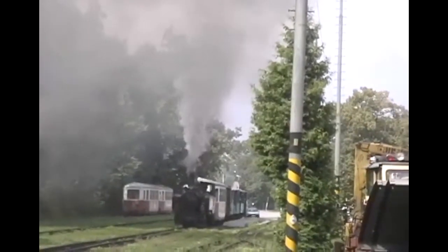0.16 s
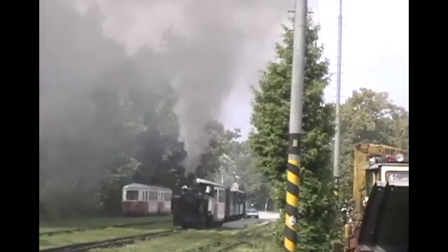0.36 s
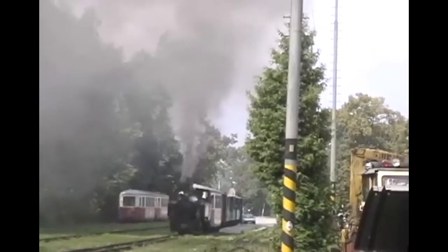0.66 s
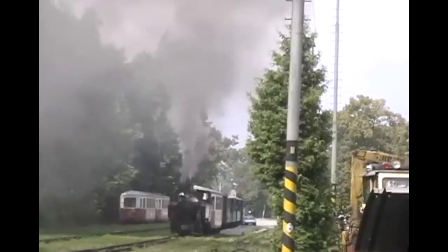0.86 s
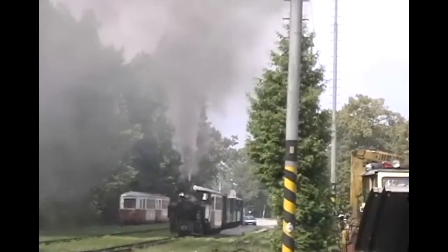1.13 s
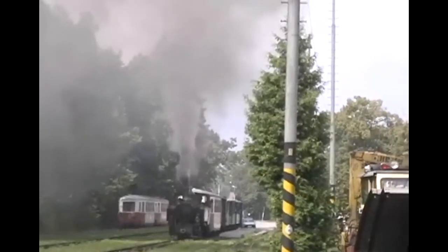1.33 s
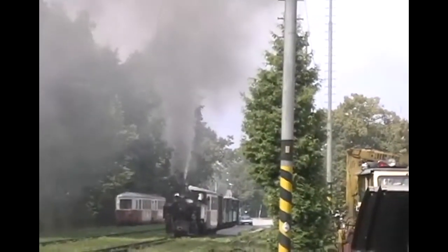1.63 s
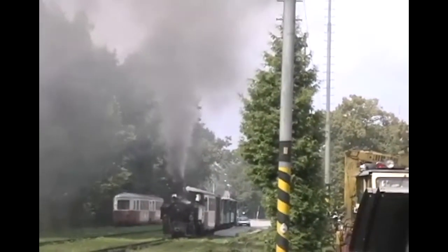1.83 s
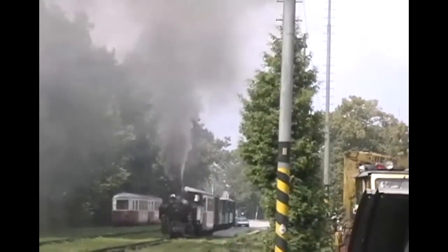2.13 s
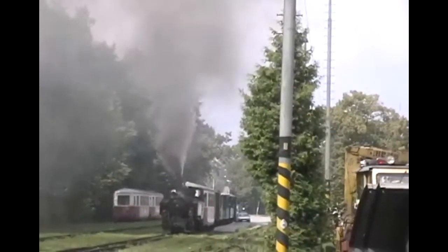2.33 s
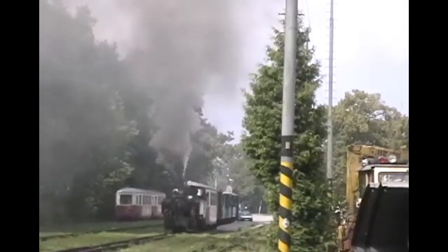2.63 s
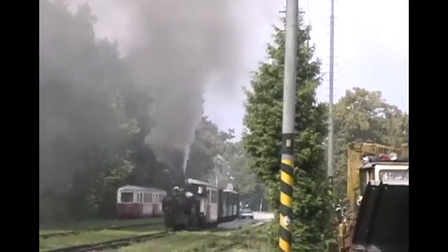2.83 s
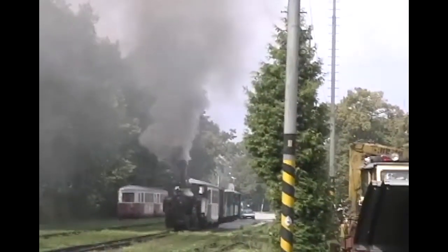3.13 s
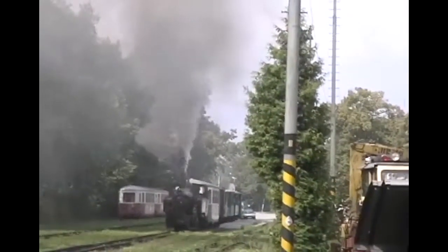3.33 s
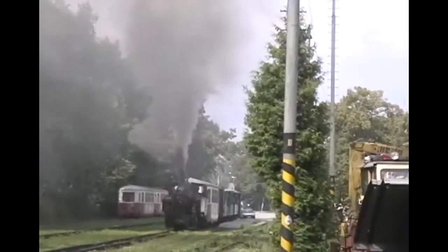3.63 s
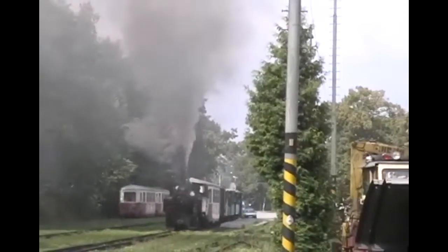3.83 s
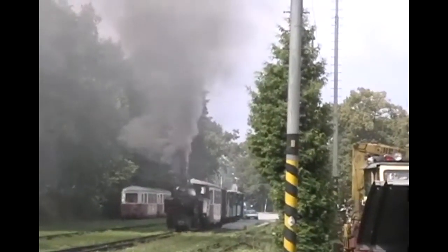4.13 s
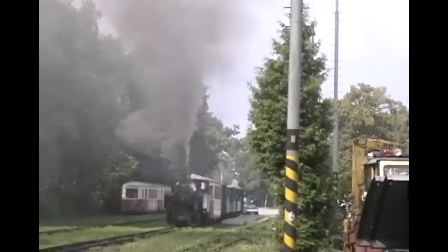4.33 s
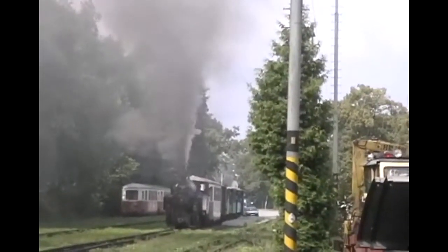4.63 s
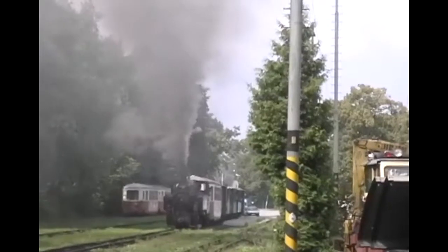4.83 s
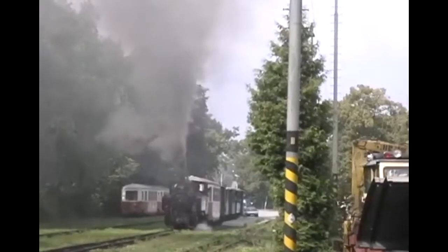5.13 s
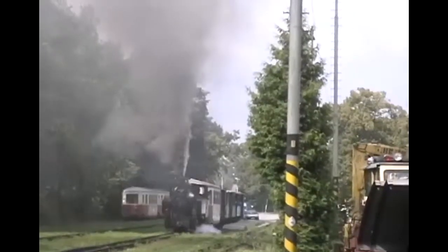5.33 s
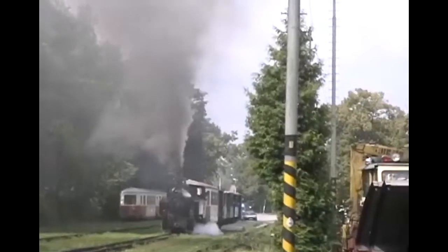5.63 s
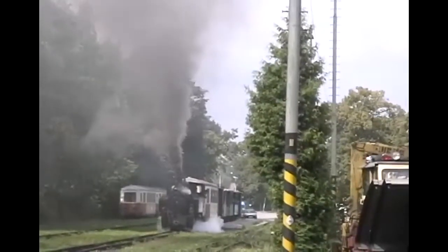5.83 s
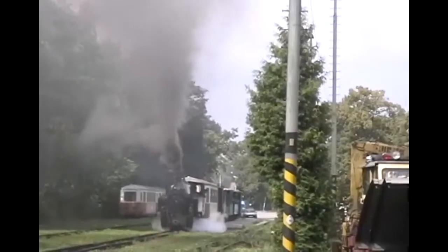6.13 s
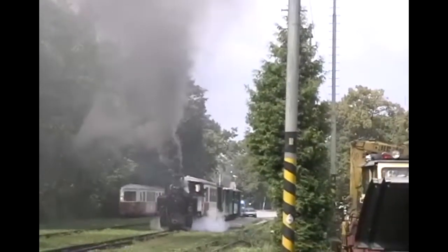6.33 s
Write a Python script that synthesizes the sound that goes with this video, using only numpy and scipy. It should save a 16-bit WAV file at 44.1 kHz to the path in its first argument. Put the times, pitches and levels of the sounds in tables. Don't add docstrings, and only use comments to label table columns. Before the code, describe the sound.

A small steam locomotive chuffs hard and slowly among trees, roaring exhaust beats alternating with whistling leaks, then drain cocks blow a wet hiss.

```python
import sys
import numpy as np
from scipy import signal
from scipy.fft import rfft, irfft, next_fast_len
from scipy.io import wavfile

SR = 44100
rng = np.random.default_rng(int(sys.argv[2]) if len(sys.argv) > 2 else 0)


def ratio_of_db(decibels):
    return 10 ** (np.asarray(decibels, float) / 20)


def transcribe(signal):
    frames = np.atleast_2d(signal).T
    limited = np.clip(frames, -1, 1)
    pcm = np.round(limited * 32767).astype(np.int16)
    wavfile.write(sys.argv[1], SR, pcm)


N = 285327
PADDED = next_fast_len(N + 3 * SR // 2)
HZ = np.maximum(np.arange(PADDED // 2 + 1) * SR / PADDED, 1)
TIME = np.arange(N) / SR

# (time [s], thump [dB], crack [dB], rasp [dB], brightness [dB])
BEATS = [
    (0.2192, -26, -18, 1, 0.5),
    (0.763, -26.5, -23, 1.5, 0),
    (1.265, -25.5, -13, 0.5, 0),
    (1.8327, -26.5, -30, 2, 3.5),
    (2.3453, -24.5, -15, 3.5, 3.5),
    (2.9244, -27.5, -30, 2.5, 1.5),
    (3.4721, -25, -19, 3, 4),
    (4.0885, -26.5, -30, 0.5, 2.5),
    (4.7450, -27.5, -18, 0, 0),
    (5.57, -36, -45, 2, 1),
]
# (time [s], top [dB], rise [s], hold [s], fall [dB per s])
BLASTS = [(-.3, -22, 0.022, 0.15, 61), (.219, -21.5, .008, 0.091, 40), (0.756, -22, 0.025, .14, 84),
          (1.263, -20, 0.0077, 0.083, 45.5), (1.83, -21.5, 0.017, 0.14, 91), (2.344, -20.5, .01, 0.082, 46),
          (2.925, -20, 0.019, .12, 87), (3.472, -19, .004, 0.027, 40), (4.084, -22, 0.023, 0.13, 62),
          (4.743, -21, 0.016, 0.1, 47.5), (5.529, -21, 0.069, 0.066, 49)]
# (frequency [Hz], level [dB per Hz])
JET_COLOUR = [(200, -30.5), (300, -22.5), (600, -12), (1000, -6), (1600, -1.5), (2250, -4), (2600, -7.5),
              (3000, -9.5), (3700, -6), (4600, -6.5), (5150, -13), (8000, -16.5), (11000, -23.5),
              (14200, -39)]
# (delay [s], share [ratio])
CHIMNEY_RETURNS = [(.0013, 0.086), (.00333, -0.12), (.00667, -0.069), (.00848, -0.028), (.00889, .09),
                   (0.0107, 0.11)]
# (delay [s], level [dB])
THUMP_ECHOES = [(.022, -12.5), (.05, -12.5)]
# (opens [s], shuts [s], opening level [dB], swell level [dB], settled level [dB])
LEAKS = [
    (-.33, .24, -37, -37, -42),
    (0.739, 1.287, -37, -38.5, -39.5),
    (1.806, 2.347, -33.5, -37, -37),
    (2.898, 3.45, -36, -32.5, -38.5),
    (4.061, 4.76, -36.5, -50, -39.5),
    (5.53, 5.975, -41, -37.5, -54),
]
# (frequency [Hz], level [dB per Hz])
LEAK_COLOUR = [(600, -72), (1000, 2.5), (1500, -1.5), (2500, -5.5), (4400, -10), (4900, -0.5), (5400, -5),
               (6100, -8.5), (7600, -8), (8600, -15.5), (9900, -17.5), (10700, -16.5), (11700, -20),
               (14000, -56)]
# (time [s], peak [dB], frequency [Hz])
SPITS = [
    (0.741, -24.5, 8700),
    (1.812, -22, 8600),
    (2.9018, -31, 7360),
    (4.0622, -31, 6700),
    (5.542, -29.5, 8150),
]
# (time [s], level [dB])
DRAIN_LEVEL = [
    (5.85, -41),
    (5.928, -41),
    (6.104, -35),
    (6.346, -36),
    (6.47, -38),
]
# (frequency [Hz], level [dB per Hz])
DRAIN_COLOUR = [(300, -5.5), (600, -8), (1300, -5), (2700, -7), (4400, -5), (5000, -3.5), (5500, -5),
                (6100, -6), (7400, -5), (8800, -11.5), (10700, -17), (14000, -28.5)]
# (time [s], pitch [ratio])
DRAIN_PITCH = [(6.0, 1.02), (6.47, .95)]
# (frequency [Hz], width [Hz], level [dB])
WHISTLES = [(5050, 260, -8.5), (5260, 170, -4), (5560, 110, -2.5), (6860, 300, -36), (7600, 500, -16.5),
            (10700, 500, -24)]
# (frequency [Hz], time [s])
WOOD_DECAY = [(300, 1.64), (1500, 0.48), (4000, 1.02), (8000, 1.08), (13000, 0.99)]
# (time [s], rumble [dB], ground shake [dB])
JOINTS = [(.63, -51, -59), (1.6, -50, -48), (3.35, -58, -59), (3.86, -60, -53), (4.21, -45.5, -62),
          (5.01, -52, -55), (5.5, -52, -53), (5.6, -41.5, -49.5), (5.85, -43, -46.5), (6.0, -48.5, -55),
          (6.23, -51, -49), (6.4, -46, -58)]
# (time [s], level [dB])
ROLLING = [(0, -58), (4.6, -55.5), (5.5, -53.5), (6.47, -55)]
# (frequency [Hz], level [dB per Hz])
RUMBLE_COLOUR = [(60, -32), (100, -5), (130, -4.5), (190, -1), (250, 7), (330, -3), (450, -29), (700, -43)]
# (frequency [Hz], level [dB per Hz])
BREEZE_COLOUR = [(15, -30), (30, -17), (60, -3), (95, -5), (130, 1), (200, -50)]
# (frequency [Hz], level [dB per Hz])
AIR_COLOUR = [(250, -8.5), (400, -7), (1000, -6), (2000, -5.5), (5000, -12), (9000, -23.5), (12000, -32),
              (14000, -58)]
# (frequency [Hz], likeness [ratio])
NEAR = [(60, -2.5), (260, 0), (430, 2.3), (710, 1.5), (1910, 0.8), (3130, 0.8), (5130, 0.7), (8400, 0.38),
        (13800, 0.2)]
# (frequency [Hz], likeness [ratio])
DIFFUSE = [(60, 0.93), (160, 0.64), (260, 0.97), (430, 0.6), (710, 0.96), (1160, 0.62), (1910, 0.54),
           (3130, 0.41), (5130, 0.48), (8400, 0.24), (13800, 0.26)]
# (frequency [Hz], phase [rad])
LEFT_LEAD = [(0, 0), (1890, -0.6), (2150, -0.76), (2410, -1.13), (2760, -0.57), (3450, -0.2), (4910, 0.83),
             (6890, -0.48), (7840, 0.83), (8960, -0.15), (9910, 0.0), (14000, -0.0)]
# (frequency [Hz], level [dB])
LEFT_EXCESS = [(60, 0.71), (98, 0.0), (160, 0.0), (260, 0.0), (430, -0.5), (710, 0.31), (1160, 1.0),
               (1910, 0.99), (3130, -1.8), (5130, -0.27), (8400, 0.76), (13800, -0.56)]


def rms_one(x):
    return x / np.sqrt(np.mean(x ** 2) + 1e-20)


def at_hz(points):
    hz, value = np.transpose(points)
    return np.interp(np.log(HZ), np.log(np.maximum(hz, 1e-300)), value)


def filtered(x, response):
    return irfft(rfft(x, PADDED) * response, PADDED)[..., :N]


def delays(returns):
    return 1 + sum(share * np.exp(-2j * np.pi * HZ * lag) for lag, share in returns)


def strokes(tables, expand=0., fade_s=0.3):
    gain = np.zeros(N)
    for rows in tables:
        fade_end = (rows[-1][0] + fade_s, rows[-1][1] - 24)
        s, db = np.transpose([*rows, fade_end])
        on = (TIME >= s[0]) & (TIME <= s[-1])
        level_db = np.interp(TIME[on], s, db + expand * (db - db.max()))
        gain[on] = np.maximum(gain[on], ratio_of_db(level_db))
    return gain


def flicker(rate_hz, depth_db):
    r = np.exp(-2 * np.pi * rate_hz / SR)
    wander = signal.lfilter([1], [1, -2 * r, r * r], rng.standard_normal(N + SR))[SR:]
    return ratio_of_db(depth_db * rms_one(wander))


def pair(common, own, likeness):
    alike = np.clip(at_hz(likeness), 0, 1)
    return filtered(common, np.sqrt(alike)) + filtered(own, np.sqrt(1 - alike))


def stereo_noise(response, likeness):
    white = rng.standard_normal((3, N))
    return rms_one(filtered(pair(white[0], white[1:], likeness), response))


def hiss(spectrum, likeness):
    return stereo_noise(ratio_of_db(at_hz(spectrum)), likeness)


def exhaust():
    s, _, _, rasp_db, bright_db = np.transpose(BEATS)
    jet = rms_one(filtered(hiss(JET_COLOUR, NEAR), delays(CHIMNEY_RETURNS)))
    jet *= flicker(220, 0.34) * flicker(24.0, 0.52)
    gulp = sum(np.exp(-((TIME - at - 0.11) / 0.03) ** 2) for at in s[::2])
    jet *= ratio_of_db(-2 * gulp)

    deep = filtered(jet, 1 / (1 + (HZ / 746) ** 8))
    body = filtered(jet, 1 / (1 + (HZ / 2900) ** 8))
    top = filtered(jet, 1 / (1 + (5200 / HZ) ** 12))
    stroke = np.clip(np.searchsorted(s, TIME + .04, "right") - 1, 0, None)

    shapes = blast_shapes()
    pressure = strokes(shapes, expand=0.14, fade_s=0.55)
    rasp_gain = strokes(shapes, expand=0.26, fade_s=0.43) * ratio_of_db(rasp_db[stroke])
    top_gain = strokes(shapes, expand=0.43, fade_s=0.34) * ratio_of_db(bright_db[stroke])
    slow = np.exp(-1 / (0.022 * SR))
    deep_gain = signal.lfilter([1 - slow], [1, -slow], pressure) * ratio_of_db(-0.5)

    eddy_hz, eddy_db = 21, 1.07
    blast = (body - deep) * pressure * flicker(eddy_hz, eddy_db)
    blast += deep * deep_gain
    blast += (jet - body - top) * rasp_gain * flicker(eddy_hz, eddy_db)
    blast += top * top_gain * flicker(eddy_hz, eddy_db)
    return blast + beats()


def blast_shapes():
    opening_db_per_s, hold_sag_db, spent_db = 404, 0.35, -27
    shapes = []
    for s, db, rise, hold, fall in BLASTS:
        peak, hold_end, held_db = s + rise, s + rise + hold, db - hold_sag_db
        spent = hold_end + (held_db - spent_db) / fall
        shapes.append([(s, db - opening_db_per_s * rise), (peak, db), (hold_end, held_db), (spent, spent_db)])
    return shapes


def beats():
    s, thump_db, crack_db = np.transpose(BEATS)[:3]
    lead = 88
    kicks = np.zeros((2, N))
    kicks[:, (s * SR).astype(int) - lead] = ratio_of_db([thump_db, crack_db])
    age = np.arange(SR // 40) / SR - lead / SR
    push = np.exp(-(age / 0.00056) ** 2) - 0.68 * np.exp(-((age - .0028) / 0.0017) ** 2)
    crack = np.cos(2 * np.pi * 2900 * age) * np.exp(-np.abs(age) / 0.0003)

    no_deep_bass = signal.butter(1, 45, "high", fs=SR, output="sos")
    thumps = signal.sosfilt(no_deep_bass, signal.fftconvolve(kicks[0], push)[:N])
    thumps = filtered(thumps, delays([(lag, ratio_of_db(db)) for lag, db in THUMP_ECHOES]))
    cracks = filtered(signal.fftconvolve(kicks[1], crack)[:N], delays(CHIMNEY_RETURNS))
    return thumps + cracks


def leaks():
    tones = whistle()
    gland = hiss(LEAK_COLOUR, NEAR) + ratio_of_db(-5.5) * tones
    gland *= strokes(leak_shapes()) * flicker(13.0, 0.62)
    return gland + drain_cocks(tones) + spits()


def leak_shapes():
    shapes = []
    for s, end, opening, swell, settled in LEAKS:
        settling = (swell + settled * 2) / 3
        shapes.append([(s, opening - 1.5), (s + 0.029, opening), (s + 0.24, swell),
                       (s + 0.35, settling), (end, settled)])
    return shapes


def whistle():
    tops = sum(ratio_of_db(db) / (1 + ((HZ - hz) / width * 2) ** 2) for hz, width, db in WHISTLES)
    return stereo_noise(tops, NEAR)


def drain_cocks(tones):
    read_s = np.cumsum(np.interp(TIME, *np.transpose(DRAIN_PITCH))) / SR - 1
    sagging = np.array([np.interp(read_s, TIME, channel) for channel in tones])
    cocks = hiss(DRAIN_COLOUR, DIFFUSE) + ratio_of_db(-5) * sagging
    cocks *= strokes([DRAIN_LEVEL]) * flicker(21, 0.52)
    return cocks * ratio_of_db(np.array([[2.1], [.3]]))


def spits():
    out = np.zeros(N)
    for s, db, hz in SPITS:
        age = np.clip(TIME - s, 0, .1)
        band = signal.butter(1, [0.83 * hz, 0.9 * hz], "band", fs=SR, output="sos")
        noise = rms_one(signal.sosfilt(band, rng.standard_normal(N)))
        decay = np.exp(-age / 0.015) + 0.72 * np.exp(-age / 0.0015)
        out += ratio_of_db(db - 9) * noise * (age > 0) * decay
    return out


def wood(x):
    size = 2 * SR
    age = np.arange(size) / SR
    tail, white = np.zeros((3, size)), rng.standard_normal((3, size))
    hz, t60 = np.transpose(WOOD_DECAY)
    for low in 150 * 2. ** np.arange(7):
        band = signal.butter(2, [low, min(2 * low, .45 * SR)], "band", fs=SR, output="sos")
        tail += signal.sosfilt(band, white) * ratio_of_db(-60 * age / np.interp(2.03 * low, hz, t60))
    tail *= 1 - np.exp(-age / 0.0058)
    echoes = filtered(x, rfft(tail / np.sqrt(np.sum(tail[0] ** 2)), PADDED))
    return ratio_of_db(-8.5) * pair(echoes[0], echoes[1:], DIFFUSE)


def after_beats(over_db, lag_s, dies_s, spent_db):
    return [[(s + lag_s, max(db + over_db, spent_db)), (s + lag_s + dies_s, spent_db)]
            for s, db, *_ in BEATS]


def thuds(levels):
    return [[(s - 0.049, db - 1), (s, db), (s + 0.096, db - 6.5)] for s, db in levels]


def rumble():
    s, rumble_db, _ = np.transpose(JOINTS)
    draught = after_beats(over_db=-17.5, lag_s=0.014, dies_s=0.25, spent_db=-55.5)
    shapes = draught + thuds(zip(s, rumble_db)) + [ROLLING]
    return hiss(RUMBLE_COLOUR, DIFFUSE) * strokes(shapes, fade_s=0.26) * flicker(17, 1.26)


def ground_shake():
    s, _, shake_db = np.transpose(JOINTS)
    puffs = after_beats(over_db=-25, lag_s=0.038, dies_s=.12, spent_db=-71)
    shake = strokes(puffs + thuds(zip(s, shake_db)), fade_s=0.54)
    breeze = strokes([ROLLING]) * ratio_of_db(-7)
    return hiss(BREEZE_COLOUR, DIFFUSE) * np.maximum(shake, breeze)


def quiet_air():
    return ratio_of_db(-43.5) * hiss(AIR_COLOUR, DIFFUSE)


def scene():
    engine = exhaust() + leaks()
    return engine + wood(engine.mean(axis=0)) + rumble() + ground_shake() + quiet_air()


def band_limit(x):
    return signal.sosfilt(signal.butter(12, 14370, fs=SR, output="sos"), x)


def record(dry):
    dry = .7 * np.tanh(dry / .7)
    dry = signal.sosfilt(signal.butter(2, 52.3, "high", fs=SR, output="sos"), dry)
    half = ratio_of_db(at_hz(LEFT_EXCESS) / 2) * np.exp(.5j * at_hz_lead())
    left, right = filtered(dry, np.array([half, 1 / half]))

    difference = (left - right) / 2
    stereo_band = 1 / (1 + (315 / HZ) ** 8) / (1 + (HZ / 10200) ** 24)
    side = filtered(difference, stereo_band) + ratio_of_db(-46) * difference
    wind = signal.sosfilt(signal.butter(2, 70, fs=SR, output="sos"), rng.standard_normal(N))
    side += ratio_of_db(-78) * rms_one(wind)
    return band_limit((left + right) / 2 + side * [[1], [-1]])


def at_hz_lead():
    return at_hz(LEFT_LEAD)


dry = scene()
out = record(dry)
transcribe(out)
```